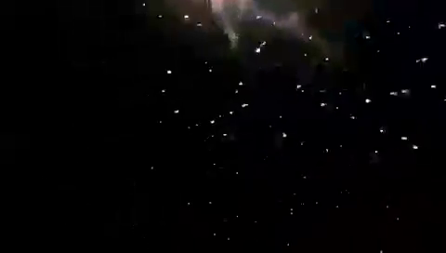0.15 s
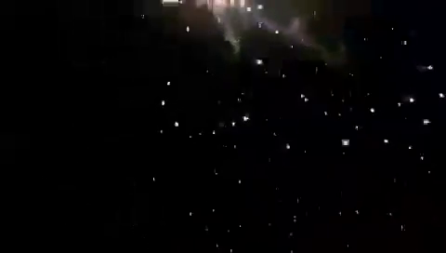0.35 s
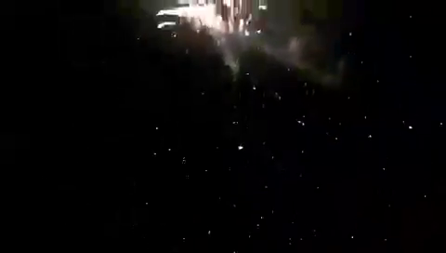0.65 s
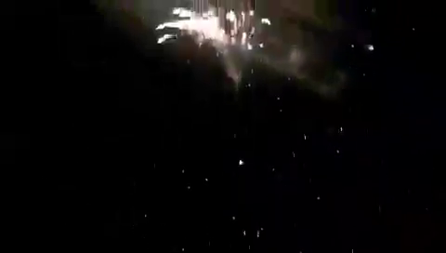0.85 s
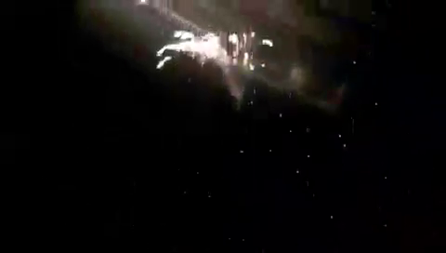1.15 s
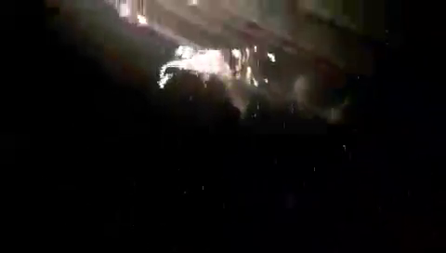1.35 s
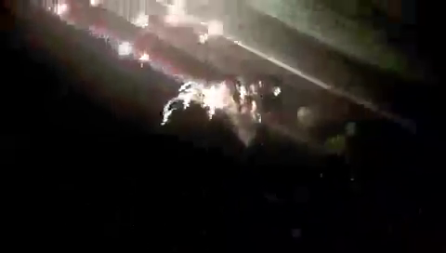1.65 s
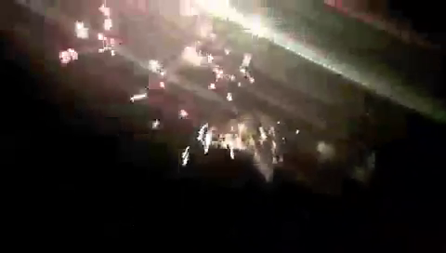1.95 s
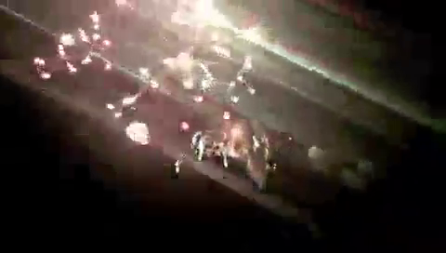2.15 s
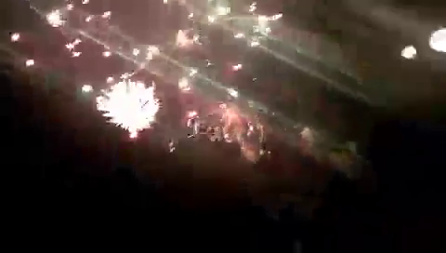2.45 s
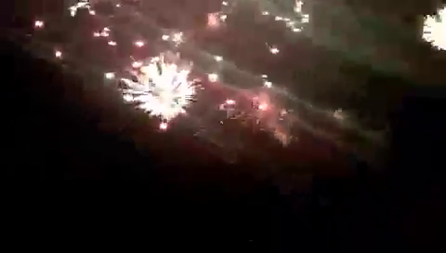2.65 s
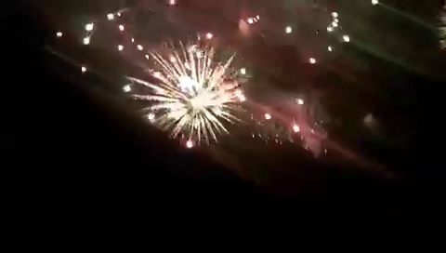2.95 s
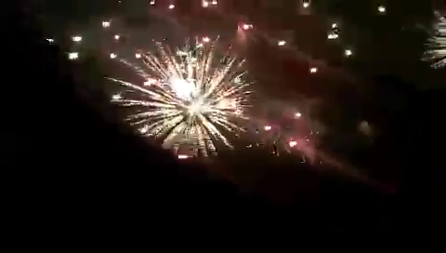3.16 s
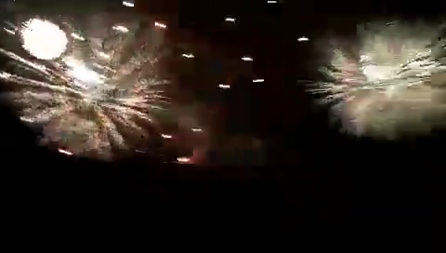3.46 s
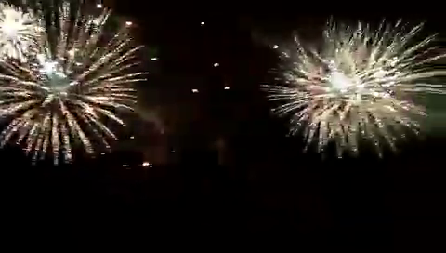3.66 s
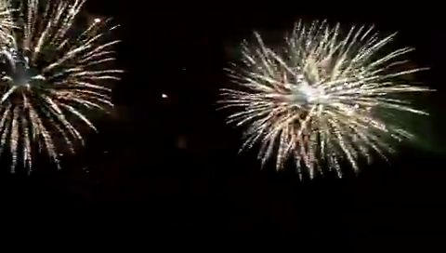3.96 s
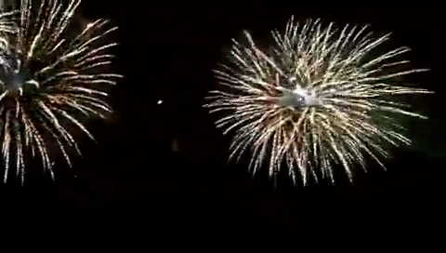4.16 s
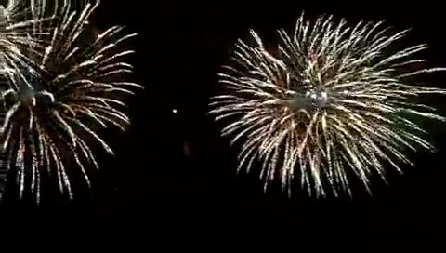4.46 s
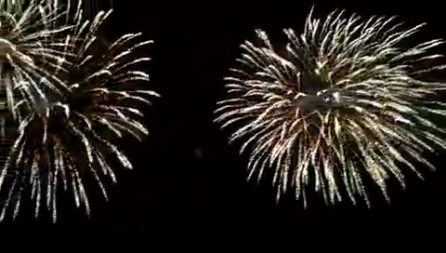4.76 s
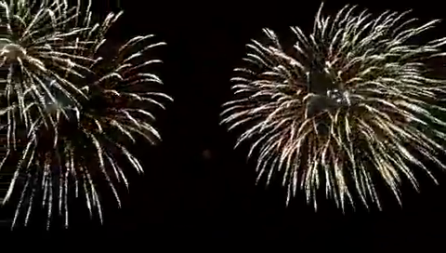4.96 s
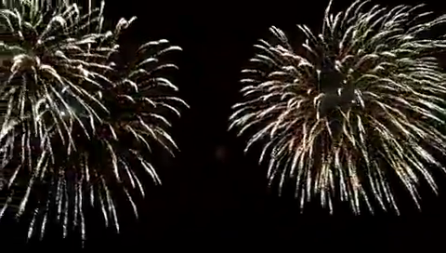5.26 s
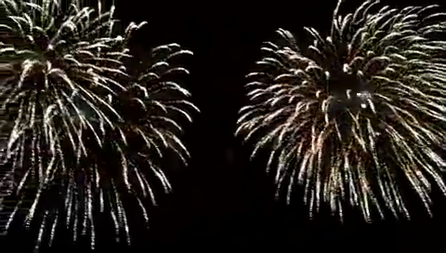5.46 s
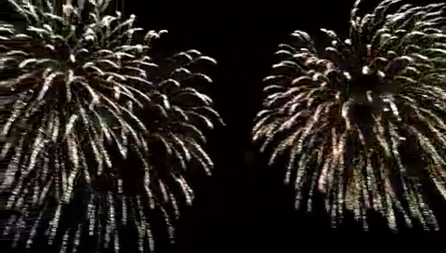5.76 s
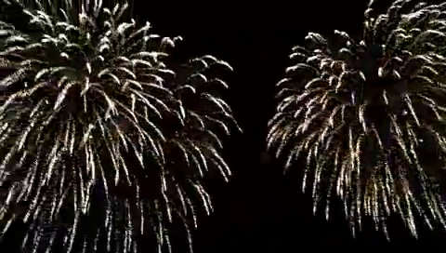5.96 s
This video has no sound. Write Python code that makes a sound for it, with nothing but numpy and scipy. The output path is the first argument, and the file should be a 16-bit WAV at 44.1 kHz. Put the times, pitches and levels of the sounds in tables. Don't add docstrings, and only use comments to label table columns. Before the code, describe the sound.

A night fireworks display over open ground. At first the deep, lumpy roll of an earlier shell fades above a far rumble, with very faint steady cricket trills. A soft spark hiss at about 0.4 s leads to a hard boom at 0.5 s, with a quick ground echo, a few slaps until 0.7 s and a rolling tail. Another hiss comes near 1.8 s, then a sharp salute at 2.0 s. From 2.2 to 3.3 s dry cracks come thick and fast, with the biggest bang at 2.96 s and heavy blasts at 3.3 and 3.4 s. Two close reports follow at 4.0 s, a large sharp burst at 4.2 s and a slap at 4.3 s. Rumble subsides until a blunt, distant thump with crackle at 5.3 s, then soft pops and splutters fade into rolling echoes by 6 s. The close stereo microphone clips on the loudest blasts.

```python
import sys
import numpy as np
from scipy import signal
from scipy.fft import rfft, irfft
from scipy.io import wavfile

SR = 44100
rng = np.random.default_rng(int(sys.argv[2]) if len(sys.argv) > 2 else 0)


def wrap_up_sound(samples):
    columns = np.atleast_2d(samples).T
    tamed = np.clip(columns, -1, 1)
    steps = np.round(tamed * 32767).astype(np.int16)
    wavfile.write(sys.argv[1], SR, steps)


def gain_from_db(level_db):
    decades = np.asarray(level_db, float) / 20
    return 10 ** decades


N = 269010
T = np.arange(N) / SR
BLAST_MS = np.arange(int(.06 * SR)) * 1000 / SR

# [f/Hz, pitch wander/Hz, level/dB, throbs/(1/s), throb depth from 0 to 1]
CRICKETS = [
    (3350, 29.5, -58.5, 32, 0.94),
    (3465, 28, -61, 29.8, 1),
    (4700, 84, -59, 35, .3),
    (4800, 84, -61, 41, .6),
    (4700, 74, -66, 40, .3),
]
# [start t/s, end t/s]
CRICKET_SPANS = [(0, 6.1), (0, 6.1), (.85, 1.34), (1.66, 1.87), (4.97, 5.13)]
# [t/s, level/dB]
FAR_DISPLAY = [(0, -30), (.15, -28), (.45, -32), (.85, -26), (1.05, -33.5), (1.75, -36.5), (2.1, -33),
               (2.45, -40), (2.7, -51), (3.15, -34), (3.38, -44), (3.55, -30.5), (3.8, -35), (4.3, -43),
               (4.5, -36), (4.95, -34.5), (5.7, -34.5), (6.1, -33)]
FAR_LAYERS_DB = (-0.05, -8.5, -13.5, -25.5)
FAR_LAYERS_FOLLOW = (0.94, 0.11, .25, 0.64)
# [f/Hz, level/dB]
RUMBLE = [(15, -2), (30, 4), (52, 11.5), (80, 5.5), (120, -3), (200, -54)]
BOOM = [(50, -54), (90, 10.5), (180, 7), (320, -2.5), (600, -48)]
BODY = [(200, -6), (400, -0.5), (800, -4), (1500, -10), (2400, -13.5), (3500, -49)]
BRIGHT = [(1800, -25), (3000, -1), (4200, -1), (5000, -4), (5700, -12.5), (7000, -17.5), (9500, -30.5),
          (11500, -38), (15000, -54)]
# [t/s, level/dB, ridge lag/s, ridge width/s]
LARGE_ROLLS = [
    (-.45, 1, 0.25, .07),
    (0.508, 0.8, 0.18, 0.065),
    (2.9607, -0.2, 0.15, 0.064),
    (3.3221, -3.5, 0.16, 0.076),
    (3.3884, -0.5, 0.16, 0.054),
    (4.2006, -1.5, 0.18, 0.081),
]
# [t/s, level/dB, ridge lag/s, ridge width/s]
FAR_SHELL_ROLL = (5.285, 0.1, 0.23, 0.088)
# [rumble/dB, boom/dB, body/dB, bright/dB]
SALUTE_ANSWER = [(-58, -40.5, -31, -43), (-60, -50, -49.5, -56)]
LARGE_ANSWER = [(-46, -21.5, -32, -38.5), (-39, -24.5, -31, -37.5)]
FAR_SHELL_ANSWER = [(-21.5, -42, -35.5, -41), (-22.5, -40, -40.5, -39)]
# [start t/s, length/s, level/dB]
SWISHES = [
    (0.369, .1, -49),
    (1.836, 0.14, -43.5),
]
# [f/Hz, level/dB]
SWISH_COLOUR = [(500, -26), (1500, -9), (4500, 6.5), (7000, 4.5), (9500, 1.5), (13000, -17), (15000, -20)]
# [t/s, level/dB, fall/ms, f/Hz]
SPLUTTERS = [(.745, -26, 12, 510), (.93, -43.5, 37, 3600), (3.82, -43.5, 57, 3500), (4.125, -46, 5, 1310),
             (5.174, -37, 28, 198), (5.111, -45, 4, 4100), (5.16, -30, 1.5, 3600), (5.180, -35, 1.7, 3650),
             (5.199, -41, 2.2, 3900), (5.2648, -8.5, 3.9, 3980), (5.266, -14, 5.6, 1150),
             (5.2705, -16.5, 1.9, 3900), (5.495, -31.5, 13, 2300), (5.34, -44, 40, 4000),
             (5.38, -42, 43, 1250), (5.72, -41.5, 62, 1500), (5.6, -42, 46, 1700), (5.69, -40, 61, 3800),
             (5.915, -47, 18, 2900), (6.01, -44.5, 15, 2650)]
# [t/s, push level/dB, push/ms, rebound level/dB]
SLAPS = [(.630, -13, 2.9, -16), (0.6824, -8, 0.8, -11), (0.6906, -8, 0.9, -13), (0.71, -19, 3.8, -12.5),
         (2.2518, -8, 0.58, -13), (2.2702, -9, 0.36, -9), (2.8455, 5.5, 0.18, -13),
         (3.0848, -12, 1.34, -11), (3.2902, -0.5, 0.22, -17), (3.3312, -10, 1.1, -29),
         (3.4282, -22, 0.17, -14), (3.4369, -8.5, 0.17, -26), (3.9996, -13, 0.93, -31),
         (4.216, -13, 25, -28), (4.3325, -3.5, 0.67, -12), (5.2584, -10, 14.54, -3.5), (5.268, 0, 1.5, -14),
         (5.316, -26, 0.5, -19), (5.42, -15.5, 5.3, -16), (5.536, -44, 8.2, -15.5), (6.0, -25.5, 3.6, -22)]
# [t/s, push level/dB, push/ms, rebound level/dB, ground echo lag/ms]
SALUTES = [(2.0247, -4.5, 0.55, 10.5, 10.6), (2.2239, 0, 0.48, 2, 10.6), (2.253, -0.5, 0.31, -4.5, 10.8),
           (2.2712, -4, 0.4, -8.5, 10.5), (2.433, 8, 0.18, -0.5, 10.9), (2.506, -2, 0.41, 1.5, 10.3),
           (2.5741, -3, 0.42, 2, 11.4), (2.6094, -8, 0.33, -5, 11.2), (2.614, -6, 0.32, -1.5, 9.8),
           (2.6318, -2.5, 0.85, -4, 9.9), (2.6535, -7.5, 0.26, -10, 9.8), (2.6766, -6.5, 0.49, -16, 10.2),
           (2.7191, 0, 0.18, -12, 11), (2.7547, -1.5, 0.3, -5.5, 11.3), (2.7979, 4, 0.46, -1, 10.8),
           (2.8342, 1, 0.41, 0.5, 10.4), (2.858, -3.5, 0.2, -22, 10.4), (3.0168, -8, 0.24, -9, 9.6),
           (3.0267, -7.5, 0.4, -11, 10.5), (3.141, 2, 0.38, -3.5, 10.4), (3.2049, 1, 0.43, -3, 11.1),
           (3.2781, -1, 0.29, -3.5, 10.4), (3.9916, -3, 0.48, 4.5, 9.6)]
# [t/s, push level/dB, push/ms, rebound/ms, ground echo lag/ms]
LARGE_SHELLS = [
    (0.507, 8.5, 1.16, 2.96, 10.6),
    (2.9589, 11.5, 0.72, 3.2, 9.2),
    (3.322, 2, 1.43, 2.8, 9.15),
    (3.3882, -4, 1.4, 2.7, 8.6),
    (4.2007, 6, 0.17, 4, 9.15),
]
# [f/Hz, outer width/Hz, inner width/Hz]
NOTCHES = [(2703, 790, 126), (5448, 1130, 75), (7870, 2900, 100), (10840, 1320, 280)]


def unit(x):
    return x / np.sqrt(np.mean(x ** 2) + 1e-20)


def coloured(white, points):
    hz, db = np.transpose(points + [(2 * points[-1][0], -100)])
    f = np.arange(N // 2 + 1) * SR / N + 1
    gain = gain_from_db(np.interp(np.log(f), np.log(hz), db))
    return unit(irfft(rfft(white) * gain, N))


def flicker(rate, db):
    r = np.exp(-2 * np.pi * rate / SR)
    slow = signal.lfilter([1], [1, -2 * r, r * r], rng.standard_normal(N + SR))[SR:]
    return gain_from_db(db * unit(slow))


def add(out, s, piece):
    i = int(round(s * SR))
    out[i:i + len(piece)] += piece[:N - i]


def buzz():
    ticks_per_s, level_db = 65, -68
    ticks = np.diff(np.floor((T + 0.004) * ticks_per_s), prepend=0)
    band = signal.butter(2, [6000, 9500], "band", fs=SR, output="sos")
    return gain_from_db(level_db) * 10 * signal.sosfilt(band, ticks)


def crickets():
    out = np.zeros(N)
    for (hz, wander_hz, db, throbs, depth), (start_s, end_s) in zip(CRICKETS, CRICKET_SPANS):
        throb_phase = 2 * np.pi * np.cumsum(throbs * flicker(3, .15)) / SR
        throb = 1 + np.clip(depth, 0, 1) * np.sin(throb_phase)
        pitch = hz + wander_hz * np.log(flicker(44.5, 8.0))
        tone = np.sin(2 * np.pi * np.cumsum(pitch) / SR)
        on = np.clip(np.minimum(T - start_s, end_s - T) / 0.022, 0, 1)
        out += gain_from_db(db) * tone * throb * on * flicker(18, 1.4)
    return out


def landscape(t):
    near_fade_s, valley_fade_s, valley_db = 0.049, .13, -5.5
    salute_ridge_s, salute_ridge_width_s = 0.083, 0.073
    salute_roll_share = 0.7
    far_db = np.interp(t, *np.transpose(FAR_DISPLAY))
    swing = np.outer(FAR_LAYERS_FOLLOW, far_db - far_db.mean())
    power = gain_from_db(far_db.mean() + np.array(FAR_LAYERS_DB)[:, None] + swing) ** 2

    bursts = []
    for s, push_db, _, rebound_db, _ in SALUTES:
        roll_db = salute_roll_share * max(push_db, rebound_db)
        bursts.append((s, roll_db, salute_ridge_s, salute_ridge_width_s, SALUTE_ANSWER))
    bursts += [(*row, LARGE_ANSWER) for row in LARGE_ROLLS]
    bursts.append((*FAR_SHELL_ROLL, FAR_SHELL_ANSWER))
    for s, db, lag_s, width_s, answer in bursts:
        since = np.maximum(t - s, 0)
        near = np.exp(-since / near_fade_s)
        valley = gain_from_db(valley_db) ** 2 * np.exp(-np.abs(since - lag_s) / valley_fade_s)
        ridge = np.exp(-((since - lag_s) / width_s) ** 2) + valley
        power += (t > s) * (gain_from_db(db + np.array(answer).T) ** 2 @ [near, ridge])
    return power


def roll():
    coarse = np.arange(0, N + 64, 64) / SR
    together = flicker(14.8, 1.05)
    colours = (RUMBLE, BOOM, BODY, BRIGHT)
    flicker_db = (2.1, 3.06, 1.02, 1.36)
    diffuse_db = (-49.5, -40.5, -38.5, -16)
    mid, side = np.zeros((2, N))
    for power, colour, own_db, wide_db in zip(landscape(coarse), colours, flicker_db, diffuse_db):
        lumps = together * flicker(64, own_db)
        gain = np.interp(T, coarse, np.sqrt(power))
        mid += gain * coloured(lumps * rng.standard_normal(N), colour)
        side += gain * gain_from_db(wide_db) * coloured(lumps * rng.standard_normal(N), colour)
    return np.array([mid, side])


def swishes():
    edge_s = 0.019
    hiss = np.array([coloured(rng.standard_normal(N), SWISH_COLOUR) for part in range(2)])
    gain = np.zeros(N)
    for s, length, db in SWISHES:
        to_edge_s = np.minimum(T - s, s + length - T)
        gain += gain_from_db(db) * np.clip(to_edge_s / edge_s, 0, 1) ** 2
    return gain * hiss * gain_from_db(np.array([[0], [-9]]))


def splutters():
    rise_share, spread_hz, widest_ratio = 0.72, 970, 2.6
    out = np.zeros(N)
    white = rng.standard_normal(N)
    for s, db, fall_ms, hz in SPLUTTERS:
        part = slice(int((s - .12) * SR), int((s + .12) * SR))
        ms = (T[part] - s) * 1000
        shape = np.exp(np.where(ms < 0, ms / rise_share, -ms) / fall_ms)
        ratio = min(1 + spread_hz / hz, widest_ratio)
        low_hz, high_hz = hz / ratio, hz * ratio
        band = signal.butter(3, [low_hz, high_hz], "band", fs=SR, output="sos")
        lift = np.sqrt(SR / 2 / (high_hz - low_hz))
        out[part] += gain_from_db(db) * signal.sosfilt(band, shape * white[part]) * lift
    return out


def lobe(u, bend):
    return np.abs(np.sin(np.pi * np.clip(u, 0, 1) ** bend))


def blast(push_db, push_ms, rebound_db, rebound_ms, skew=0.72, flat=1):
    push = gain_from_db(push_db) * lobe(BLAST_MS / push_ms, skew)
    rebound_time = (BLAST_MS - 0.882 * push_ms) / (1.104 * rebound_ms)
    rebound = gain_from_db(rebound_db) * lobe(rebound_time, 0.53) ** flat
    return rebound - push


def fading_after(start_ms):
    return (BLAST_MS > start_ms) * np.exp(-np.maximum(BLAST_MS - start_ms, 0) / 5.75)


def shells():
    out = np.zeros(N)
    scatter = coloured(rng.standard_normal(N), [(150, -15), (500, 3.0), (1100, 2), (2200, -3.5), (4500, -8),
                                                (6000, -22.5), (15000, -37)])
    rasp = coloured(rng.standard_normal(N), [(800, 7), (1600, 5), (4500, 7.0), (7000, -29.0), (12000, -18)])
    bursts = []
    for s, push_db, push_ms, rebound_db, lag_ms in SALUTES:
        bursts.append((s, push_db, push_ms, rebound_db, 0.84, lag_ms))
    for s, push_db, push_ms, rebound_ms, lag_ms in LARGE_SHELLS:
        bursts.append((s, push_db, push_ms, min(-0.5, push_db + 1.5), rebound_ms, lag_ms))

    for s, push_db, push_ms, rebound_db, rebound_ms, lag_ms in bursts:
        add(out, s, blast(push_db, push_ms, rebound_db, rebound_ms, flat=1 / (1 + 0.12 * rebound_ms)))
        echo_db = min(max(push_db, rebound_db), 4) - 3.0 - 0.66 * rebound_ms
        echo_ms = max(push_ms, 0.57 * rebound_ms)
        echo_skew = max(.85 - 0.35 * echo_ms, .25)
        echo = blast(echo_db, echo_ms, echo_db - 6.0 - 7.7 * echo_ms, 2.67 * echo_ms, skew=echo_skew)
        echo_s = s + lag_ms / 1000
        add(out, echo_s, echo)
        add(out, echo_s + 0.0075, gain_from_db(-13.0 - 5.6 * echo_ms) * echo)

        here = slice(int(s * SR), int(s * SR) + len(BLAST_MS))
        scatter_shape = fading_after(push_ms) + 0.42 * fading_after(lag_ms)
        add(out, s, gain_from_db(echo_db - 17.0) * scatter_shape * scatter[here])
        third_bounce = np.exp(-((BLAST_MS - lag_ms - 9.2) / 0.25) ** 2)
        add(out, s, gain_from_db(echo_db - 11.0 - 5.3 * echo_ms) * third_bounce * rasp[here])
        ragged_front = np.exp(-((BLAST_MS - push_ms) / 0.99) ** 2)
        add(out, s, gain_from_db(echo_db - 10.5) * ragged_front * rasp[here])

    for s, push_db, push_ms, rebound_db in SLAPS:
        rebound_ms = 1.88 * push_ms ** 0.646
        add(out, s, blast(push_db, push_ms, rebound_db, rebound_ms))
    return signal.sosfilt(signal.butter(3, 6800, fs=SR, output="sos"), out)


def scene():
    port_lag_s = 2.2e-5
    mid, side = roll() + swishes()
    mid = mid + crickets() + splutters() + shells()
    f = np.arange(N // 2 + 1) * SR / N
    lag = -1j * np.tan(np.clip(np.pi * f * port_lag_s, 0, 1.2))
    lag = lag * f / (f + 900)
    side = side + irfft(rfft(mid) * lag, N)
    return np.array([mid + side, mid - side])


def resonate(x, hz, width_hz):
    r = np.exp(-np.pi * width_hz / SR)
    ring = [1, -2 * r * np.cos(2 * np.pi * hz / SR), r * r]
    return signal.lfilter([(1 - r * r) / 2, 0, (r * r - 1) / 2], ring, x)


def notch(x, hz, outer_hz, inner_hz):
    c = np.cos(2 * np.pi * hz / SR)
    ro, ri = np.exp(-np.pi * outer_hz / SR), np.exp(-np.pi * inner_hz / SR)
    dip, spread = [1, -2 * ri * c, ri * ri], [1, -2 * ro * c, ro * ro]
    return signal.lfilter(dip, spread, x) * sum(spread) / sum(dip)


def band_limit(x):
    return signal.sosfilt(signal.butter(12, 16540, fs=SR, output="sos"), x)


def record(dry):
    x = dry + 0.14 * resonate(dry, 4140, 1100)
    top = 0.89
    x = x / (1 + np.abs(x / top) ** 16) ** (1 / 16)
    x = x + 0.66 * resonate(x, 14000, 2000)
    for hz, outer_hz, inner_hz in NOTCHES:
        x = notch(x, hz, outer_hz, inner_hz)
    x = signal.sosfilt(signal.butter(1, 12, "high", fs=SR, output="sos"), x)
    x = x + gain_from_db(-82) * rng.standard_normal(x.shape) + buzz()
    x = signal.sosfilt(signal.cheby2(12, 50, 16600, fs=SR, output="sos"), x)
    return band_limit(x)


dry = scene()
out = record(dry)
wrap_up_sound(out)
```